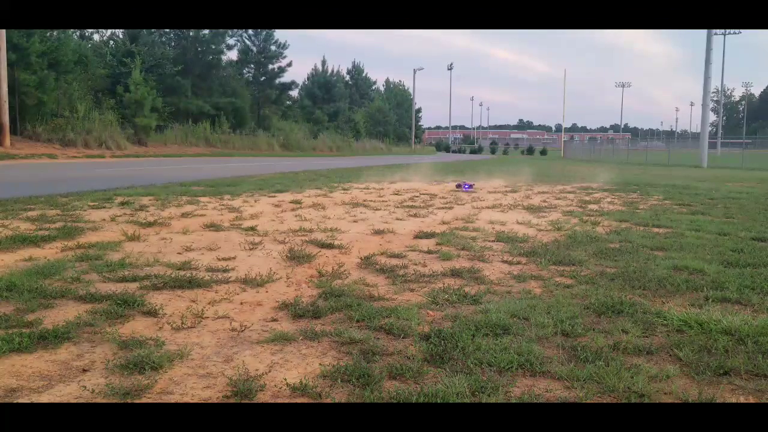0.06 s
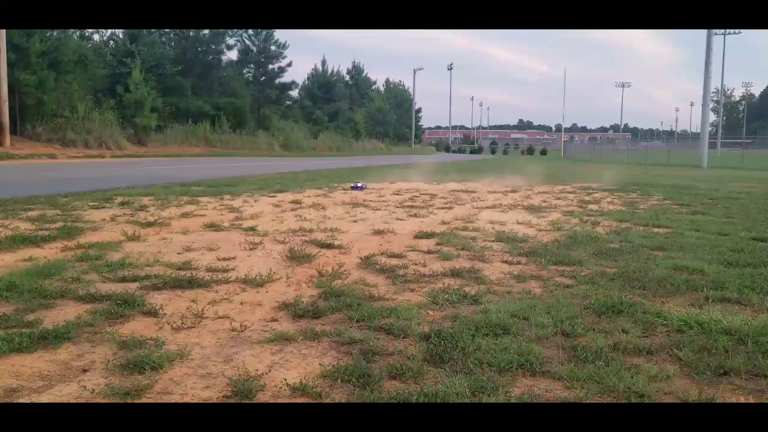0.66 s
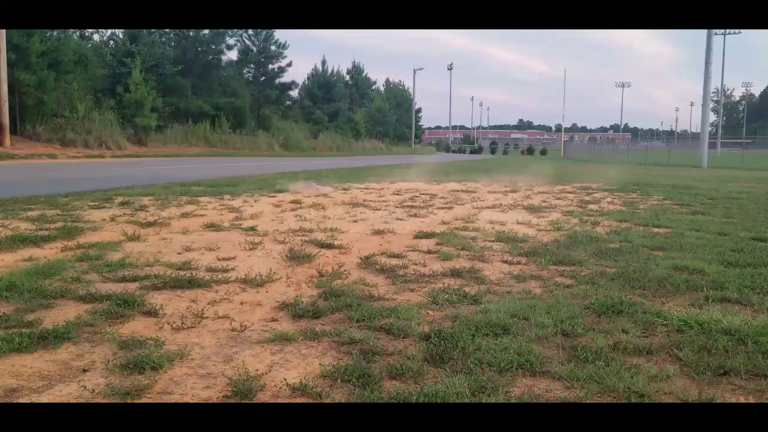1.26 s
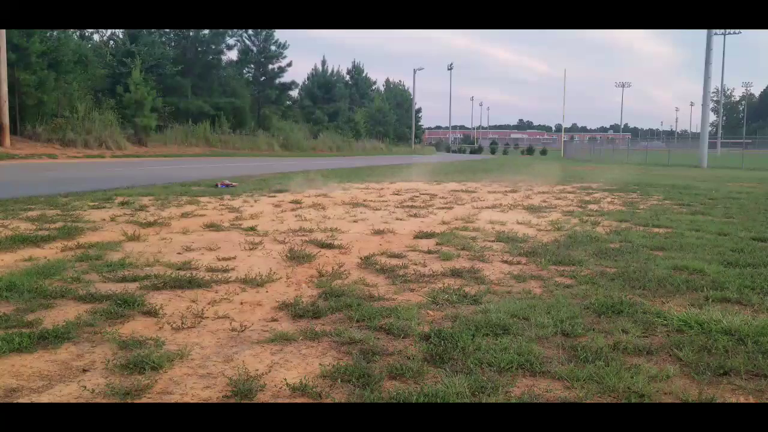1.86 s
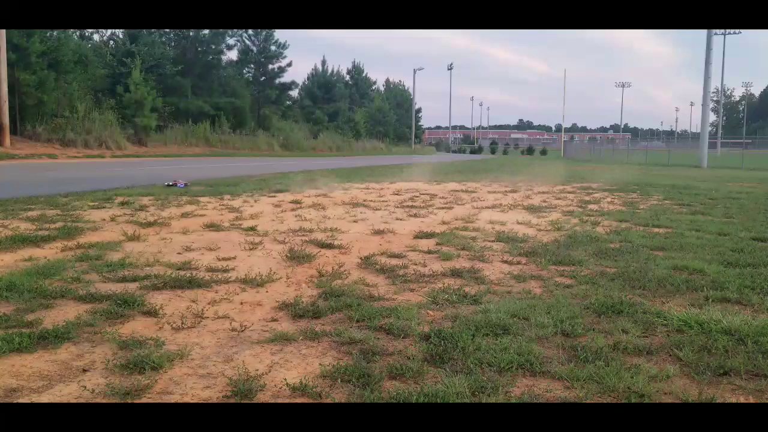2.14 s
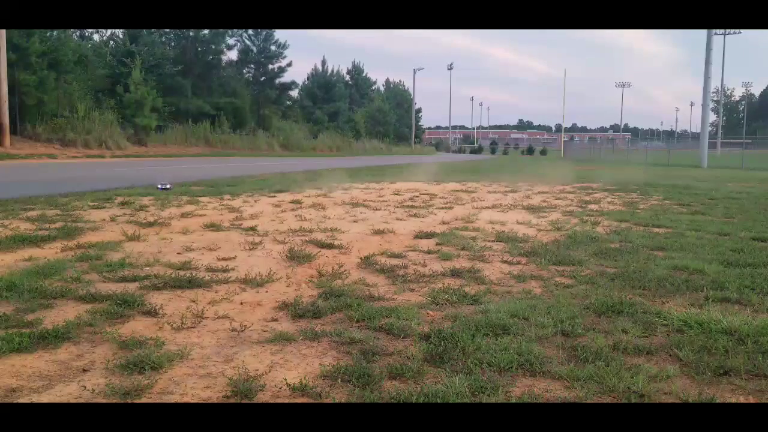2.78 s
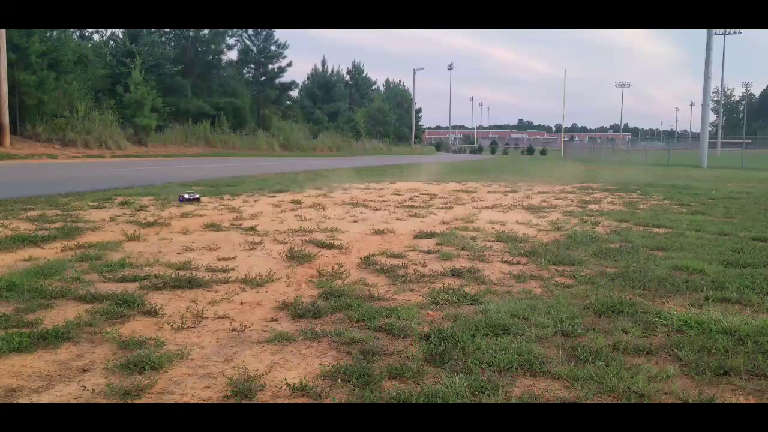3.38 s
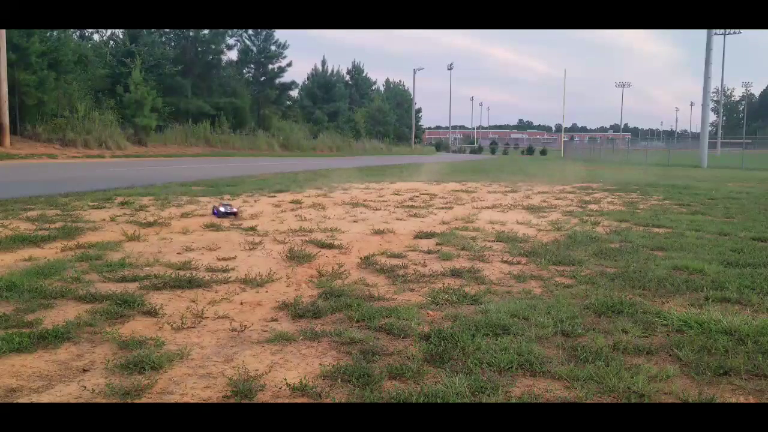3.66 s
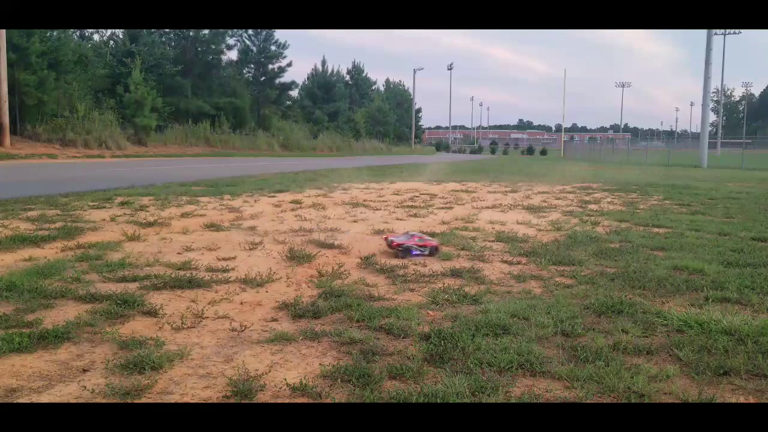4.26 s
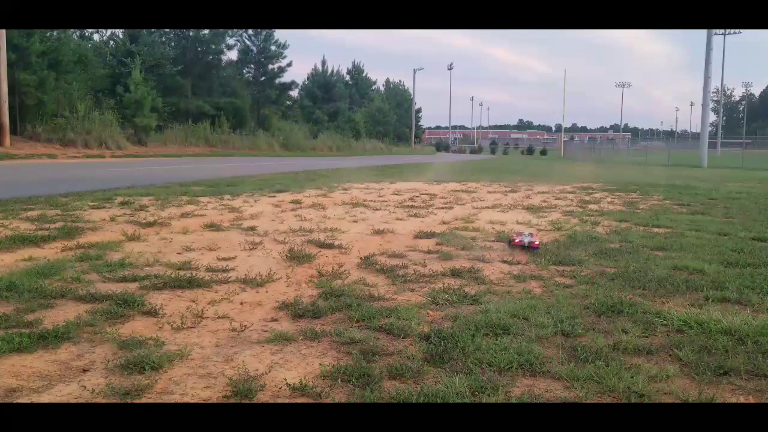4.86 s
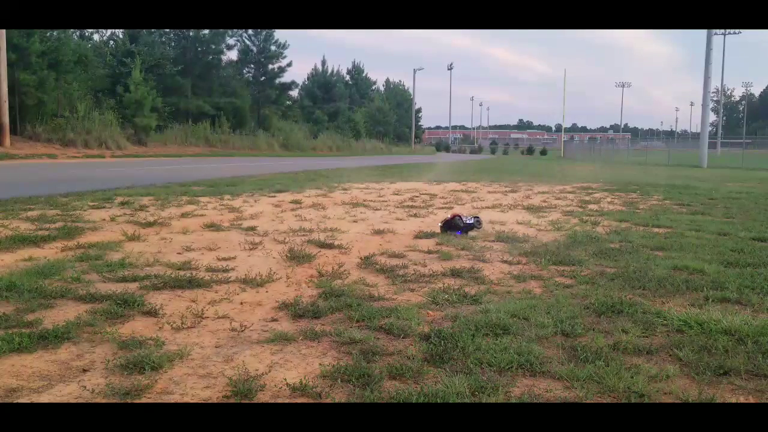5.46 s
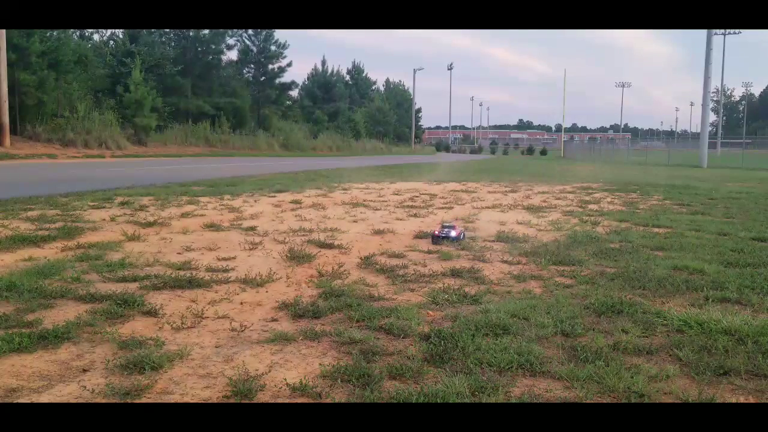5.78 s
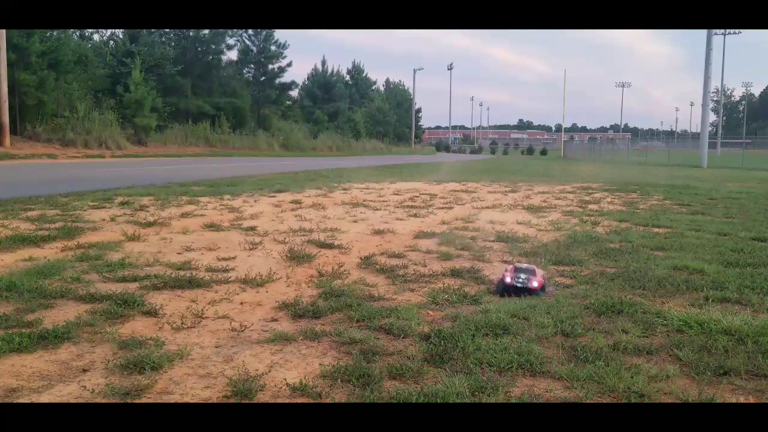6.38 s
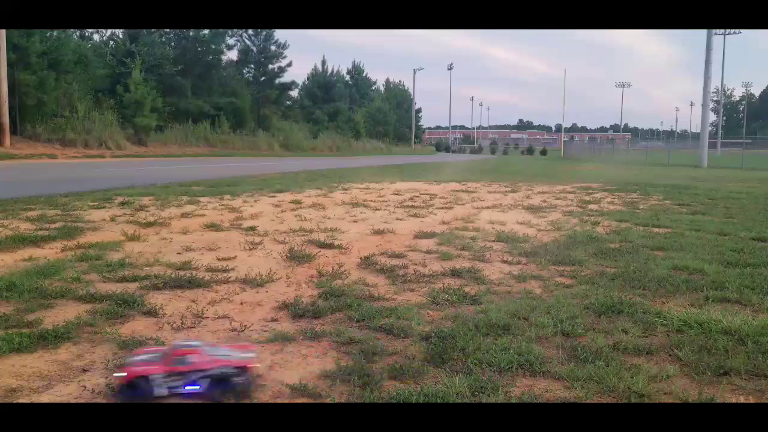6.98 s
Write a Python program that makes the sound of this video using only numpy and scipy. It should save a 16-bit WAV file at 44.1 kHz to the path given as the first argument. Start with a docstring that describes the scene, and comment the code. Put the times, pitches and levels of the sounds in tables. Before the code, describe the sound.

Outdoors, over a constant hiss, rumbling air and a distant droning engine, a toy truck's electric motor whines some way off. The pitch drops, then revs back up in short, raspy surges. As the truck approaches, its tyres scuff through sand and thud over grass tufts, the plastic shell knocks and the gears briefly rattle. The whine and scrabbling grow louder as it passes close to the microphone.

```python
"""Toy truck in an open field

A small electric truck laps a patch of dirt and grass, then passes close by. Its motor hums and its
gears whine, revving up on each hop and biting on each landing; free-spinning wheels set them rattling.
The tyres scrabble, throw grit and thud over tufts, and hard landings clatter the plastic body.
Behind it a far engine drones and the air rumbles, under a steady high hiss."""
import sys
import numpy as np
from scipy import signal
from scipy.fft import rfft, irfft
from scipy.io import wavfile
from scipy.ndimage import uniform_filter1d, map_coordinates

SR = 44100
rng = np.random.default_rng(int(sys.argv[2]) if len(sys.argv) > 2 else 0)


def wav_out(sig):
    """Save sig, one row per channel (or a flat mono array), as 16-bit PCM at SR to the path in sys.argv[1]."""
    wavfile.write(sys.argv[1], SR, np.round(np.clip(np.atleast_2d(sig).T, -1, 1) * 32767).astype(np.int16))


N = 314433
T = np.arange(N) / SR

# Rumble of open air. Each row: frequency in Hz, relative level in dB.
AIR_SPECTRUM = [(25, -16), (50, -2), (85, 3), (150, 3), (300, -9), (800, -27.5), (1200, -30), (2000, -96)]
# Steady high hiss, brightest near 7 kHz; the top of the sound has a deep gap around 11 kHz. Each row: frequency
# in Hz, relative level in dB.
HISS_SPECTRUM = [(2600, -11.5), (3300, 13), (6300, 15.5), (7100, 22.5), (7700, 14.5), (8500, -11),
                 (11000, -71), (14000, 8.5), (16000, -19)]
# Fader ride of the far engine. Each row: time in seconds, level in dB.
ENGINE_LEVEL = [(0, -51), (.6, -46), (3.3, -45), (3.75, -42), (5, -48), (7.13, -56)]
# Its partials. Each row: multiple of the firing rate, level in dB.
ENGINE_PARTIALS = [(.625, -14.5), (.875, -10.5), (1, 0), (1.375, -15), (1.625, -16.5)]
# The truck's path. Each row: time in seconds, lag of the right microphone in ms, sand over soil in dB.
PATH = [(0, 0.029, -1), (2.2, 0.14, -6), (3.3, 0.19, 1), (4.8, -0.05, -1.5), (5.6, -0.021, 8.5),
        (6.7, -0.037, -2), (7.13, 0.22, -1)]
# Bumps over tufts. Each row: start in seconds, level in dB.
TUFTS = [(0.809, -48), (1.656, -42.5), (2.841, -45.5), (3.749, -47.5), (4.485, -43.5), (4.63, -43.5),
         (6.101, -37.5)]
# The chassis hits the ground. Each row: start in seconds, level in dB.
CHASSIS_HITS = [(4.037, -42.5), (4.087, -44), (4.198, -46.5), (4.242, -45.5), (5.019, -46.5),
                (5.684, -40.5), (6.833, -46), (6.902, -41)]
# Ring of the plastic body. Each row: frequency in Hz, width in Hz, relative level in dB.
BODY_MODES = [(448.6, 130, 6), (766, 54, 26), (1105, 112, 27), (2050, 2800, 11)]
# Tyres sliding through a turn. Each row: start and length in seconds, first and last pitch in Hz,
# level in dB, flutter rate in Hz.
SLIDES = [(1.123, 0.035, 1076, 1100, -44.5, 79), (1.128, 0.22, 2192, 1421, -53.5, 260.2)]
# Scrabble of the rolling tyres. Each row: time in seconds, level in dB.
SCRABBLE_LEVEL = [(0, -55), (1.2, -52.5), (1.8, -57.5), (2.1, -58.5), (2.45, -73), (2.85, -57.5),
                  (3.85, -51.5), (4.45, -55), (4.7, -48.5), (5.5, -51.5), (6.55, -46.5), (7.13, -42)]
# The tyres dig in. Each row: start and length in seconds, level in dB.
SCUFFS = [(3.928, 0.089, -47.5), (4.034, 0.14, -45), (4.205, 0.098, -45.5), (5.059, 0.075, -48.5),
          (6.35, 0.066, -45), (6.684, 0.053, -39.5), (6.85, 0.19, -37.5)]
# Dull slap of tread on soil. Each row: frequency in Hz, relative level in dB.
SOIL_SPECTRUM = [(150, -36), (330, 5.5), (480, 10), (620, 5), (1150, 7.5), (1600, -0.5), (2400, -1),
                 (8000, -20.5)]
# Bright edge of sand and scraping gears. Each row: frequency in Hz, relative level in dB.
GRIT_SPECTRUM = [(1000, -4.5), (4200, 8), (8500, -6.5), (13000, 0.5), (16000, -6.5)]
# Pace between hops. Each row: time in seconds, tooth rate in Hz.
ROLLING_SPEED = [(0, 4200), (1.082, 4350), (1.308, 3907), (2.6, 1473), (2.71, 2408), (2.799, 2890),
                 (2.97, 3250), (3.4, 4265), (3.62, 4393), (3.9, 5100), (4.55, 1583), (5.27, 4460),
                 (6.5, 2569), (6.6, 3150), (6.802, 2590), (7.089, 2028)]
# The wheels lift, rev up, land and bite. Each row: landing time and air time in seconds,
# top and gripping tooth rates in Hz, level of the bite in dB.
HOPS = [(0.086, 0.052, 4433, 4120, -64), (.185, 0.041, 4400, 4208, -61), (.37, 0.042, 4400, 4206, -64),
        (.505, 0.04, 4420, 4100, -57), (.58, 0.03, 4400, 4090, -55), (.655, 0.034, 4300, 3601, -51),
        (.755, 0.038, 4900, 4543, -55), (0.945, 0.054, 4583, 4143, -56), (1.23, .05, 4023, 3770, -49.5),
        (1.39, 0.084, 4000, 3680, -50.5), (1.478, 0.043, 4130, 3854, -50), (1.565, 0.032, 4120, 3740, -47),
        (1.646, 0.038, 4370, 3500, -49), (2.895, 0.063, 3397, 2916, -59), (3.106, 0.11, 4423, 3385, -51.5),
        (3.289, 0.056, 4700, 3965, -53.5), (3.77, 0.065, 4830, 4176, -39.5),
        (4.657, 0.077, 2010, 1627, -37), (4.744, 0.034, 2753, 2438, -42), (4.845, 0.054, 3473, 3134, -47),
        (4.923, 0.034, 3636, 3413, -46), (5.036, 0.049, 4310, 3682, -46), (5.185, 0.081, 4000, 3883, -48.5),
        (5.69, 0.42, 5386, 4096, -47), (5.88, 0.031, 4150, 2961, -45), (5.987, 0.059, 3530, 3046, -44.5),
        (6.09, 0.051, 4090, 3300, -47), (6.142, 0.007, 3182, 3132, -42), (6.3, 0.13, 4533, 3937, -45.5),
        (6.385, 0.022, 3574, 2764, -53.5), (6.68, 0.092, 3900, 2960, -60), (6.915, 0.1, 3400, 3036, -37),
        (6.996, 0.024, 3140, 2390, -46)]
# Motor hum under throttle. Each row: time in seconds, level in dB.
HUM_LEVEL = [(0, -60.5), (1.12, -64), (1.7, -63), (1.8, -95), (2.55, -92), (2.75, -73), (3.55, -58.5),
             (4.0, -64), (4.5, -89), (4.8, -65), (5.17, -55.5), (5.3, -50), (5.66, -53.5), (5.8, -64.5),
             (6.48, -53), (6.62, -61), (6.8, -70)]
# Rotor and shaft tones. Each row: multiple of motor speed, level in dB.
HUM_PARTIALS = [(1.35, -11), (2.7, -8.5), (4, 3.5), (10.8, 2.5), (13.2, -1.5), (14.7, -4.5), (16, 0)]
# How the gearbox radiates. Each row: frequency in Hz, gain in dB.
GEARBOX_EQ = [(1800, -28.5), (3100, 7.5), (4100, 3), (5300, 6.5), (6500, 9), (10000, -28)]
# Free-spinning wheels. Each row: start and length in seconds, level in dB, attack and release in seconds.
FREE_SPINS = [(1.103, 0.029, -46.5, 0.014, 0.41), (5.485, 0.25, -38, 0.12, 0.0066)]
# Tones of the rattle. Each row: multiple of motor speed, level in dB.
RATTLE_PARTIALS = [(2.75, 22.5), (6.05, 3.5), (15.1, -19.5)]
# Gear whine between bites. Each row: time in seconds, level in dB.
WHINE_LEVEL = [(0, -65), (1.0, -62.5), (1.33, -47), (1.8, -81), (2.5, -82), (2.65, -43), (2.82, -53),
               (2.97, -51), (3.05, -61), (3.7, -47), (4.3, -94), (4.61, -41.5), (4.82, -52.5), (5.17, -54),
               (5.4, -61), (5.78, -51.5), (6.42, -63), (6.57, -42.5), (6.76, -74), (6.89, -38), (7.09, -49)]
# Its partials. Each row: multiple of motor speed, level in dB under throttle, level in dB while braking.
WHINE_PARTIALS = [(10.8, -13, -14), (12, 0, 0), (16, -11, -19), (24, -24, -16)]
# Rasp of the gears. Each row: time in seconds, roughness from 0 to 1.
GEAR_RASP = [(.6, .65), (1.3, .3), (2.9, .5), (3.1, .85), (4.8, .45), (6.6, .6), (6.9, .25)]

TEETH, MOTOR_TURNS_PER_WHEEL = 12, 6.65
SCUFF_ATTACK_S, SCUFF_RELEASE_S = 0.034, 0.015


def from_db(db):
    """Decibels to gain."""
    return 10 ** (np.asarray(db) / 20)


def unit_rms(x):
    """Scale to rms 1."""
    return x / np.sqrt(np.mean(x ** 2) + 1e-20)


def curves(rows):
    """Each column of a timed table, drawn out to every sample."""
    s, *columns = np.transpose(rows)
    return [np.interp(T, s, c) for c in columns]


def eq_gain(points, hz):
    """Gain of an EQ curve at any frequency."""
    f, db = np.transpose(points)
    return from_db(np.interp(np.log(np.maximum(hz, 1)), np.log(f), db))


def coloured(x, spectrum):
    """EQ a steady signal and cut the sub-bass; rms 1."""
    hz = np.arange(N // 2 + 1) * SR / N
    return unit_rms(irfft(rfft(x) * eq_gain(spectrum, hz) * (hz > 20), N))


def drift(rate_hz):
    """A smooth random wobble of rms about 1."""
    r = np.exp(-40 * np.pi * rate_hz / SR)
    slow = signal.lfilter([1], [1, -2 * r, r * r], rng.standard_normal(N // 20 + 4002))[4000:]
    return np.interp(np.arange(N) / 20, np.arange(len(slow)), unit_rms(slow))


def resonance(x, hz, width_hz):
    """Two-pole band-pass with a peak gain of 1."""
    r = np.exp(-np.pi * width_hz / SR)
    feedback = [1, -2 * r * np.cos(2 * np.pi * hz / SR), r * r]
    return signal.lfilter(np.array([1, 0, -1]) * (1 - r * r) / 2, feedback, x)


def tone(hz, rough, flutter_hz):
    """A gliding sine of rms 1, a share of which flutters at random."""
    phase = 2 * np.pi * np.cumsum(hz) / SR + rng.uniform(0, 2 * np.pi)
    rough = np.clip(rough, 0, 1)
    flutter = drift(flutter_hz) * np.sin(phase) + drift(flutter_hz) * np.cos(phase)
    return np.sqrt(2 * (1 - rough ** 2)) * np.sin(phase) + rough * flutter


def grains(per_s, spread_db):
    """Random clicks of uneven size."""
    sizes = from_db(spread_db * np.minimum(rng.exponential(1, N), 5))
    return (rng.random(N) < per_s / SR) * sizes * rng.choice([-1, 1], N)


def swell(start, length, attack=SCUFF_ATTACK_S, release=SCUFF_RELEASE_S):
    """An envelope that rises to 1 by the start, holds and dies away."""
    return np.exp(-np.clip(np.maximum((start - T) / attack, (T - start - length) / release), 0, 20))


def decays(hits, t60):
    """An envelope that jumps at each hit and falls 60 dB in t60 seconds."""
    return sum(from_db(db - 60 * np.maximum(T - s, 0) / t60) * (T >= s) for s, db in hits)


def open_air(level_db=-48.5, side_db=-12.0):
    """A low, narrow stereo bed of rumbling air."""
    mid, side = (coloured(white, AIR_SPECTRUM) for white in rng.standard_normal((2, N)))
    return from_db(level_db) * (mid + from_db(side_db) * side * [[1], [-1]])


def far_engine(centre_hz=135.4):
    """A far engine with uneven cylinders drones, slowly gaining speed."""
    firing_hz = np.linspace(centre_hz - 2, centre_hz + 2, N)
    drone = sum(from_db(db) * tone(k * firing_hz, rough=0.14, flutter_hz=6.2)
                for k, db in ENGINE_PARTIALS)
    return from_db(curves(ENGINE_LEVEL)[0]) * drone


def field_reverb(x, t60=0.35, wet_db=-18):
    """A faint, smooth tail scatters back from the ground and the trees."""
    t = T[:SR // 2]
    tails = rng.standard_normal((2, len(t))) * from_db(-60 * t / t60)
    tails *= from_db(wet_db) / np.linalg.norm(tails, axis=1, keepdims=True)
    return signal.fftconvolve(x[None], tails)[:, :N]


def tuft_thuds(t60=0.14, hz=500, width_hz=520):
    """Each tuft knocks a short, dull thud out of the hollow tyres."""
    noise = rng.standard_normal(N)
    hollow = lambda x: resonance(resonance(x, hz, width_hz), hz, width_hz)
    return hollow(decays(TUFTS, t60) * noise + 1e-18) / np.std(hollow(noise))


def chassis_clatter(t60=0.13, knock_db=9.0):
    """Each hard landing shakes a short clatter out of the plastic body."""
    clatter = decays(CHASSIS_HITS, t60) * unit_rms(grains(per_s=2000, spread_db=2.5)) + 1e-18
    ring = sum((-1) ** k * from_db(db) * resonance(clatter, hz, width)
               for k, (hz, width, db) in enumerate(BODY_MODES))
    return from_db(knock_db) * ring * np.std(clatter) / np.std(ring)


def tyre_slide():
    """The sliding tyres squeal briefly and scrape downward in pitch."""
    return sum(from_db(db) * swell(s, length)
               * tone(np.interp(T, [s, s + length], [from_hz, to_hz]), rough=0.89, flutter_hz=flutter)
               for s, length, from_hz, to_hz, db, flutter in SLIDES)


def tyre_scrabble(sand_db, stones_db=-32.0, soil_lump_db=2, sand_lump_db=1.4):
    """Tread slaps the soil in lumps and flings sand and crackling stones, most where the tyres dig in."""
    scuffs = sum(from_db(db) * swell(s, length) for s, length, db in SCUFFS)
    level = np.hypot(from_db(curves(SCRABBLE_LEVEL)[0]), scuffs)
    lumps = drift(rate_hz=13.6)
    slaps, patter = grains(per_s=2500, spread_db=2.2), grains(per_s=6000, spread_db=1.5)
    soil = from_db(soil_lump_db * lumps) * coloured(slaps, SOIL_SPECTRUM)
    sand = from_db(sand_db + sand_lump_db * lumps) * coloured(patter, GRIT_SPECTRUM)
    stones = unit_rms(resonance(grains(per_s=110, spread_db=3.5), hz=2200, width_hz=4500))
    return level * (soil + sand + from_db(stones_db) * stones)


def drive(min_grip_s=.033, grip_hz_per_s=70000, attack_s=0.0029, release_s=0.0058, air_lift_db=0.5):
    """Motor speed in Hz and whine in dB: the wheels race in each hop and bite as they land."""
    # The tyres take longer to pull down a higher rev.
    grips_s = [min_grip_s + abs(top_hz - low_hz) / grip_hz_per_s for _, _, top_hz, low_hz, _ in HOPS]
    gripping = [(s + grip_s, low_hz) for (s, _, _, low_hz, _), grip_s in zip(HOPS, grips_s)]
    tooth_hz = curves(sorted(gripping + [tuple(row) for row in ROLLING_SPEED]))[0]
    airborne = bites = 0
    for (s, air_s, top_hz, _, db), grip_s in zip(HOPS, grips_s):
        rev_up = 1 - np.clip((s - T) / air_s, 0, 1) ** 2
        hop = rev_up * np.clip(1 - (T - s) / grip_s, 0, 1)
        tooth_hz = tooth_hz + (top_hz - tooth_hz) * hop
        airborne = np.maximum(airborne, hop)
        bite = from_db(db) * swell(s + attack_s, grip_s - attack_s, attack_s, release_s)
        bites = np.maximum(bites, bite)
    whine = np.maximum(from_db(curves(WHINE_LEVEL)[0] + air_lift_db * airborne), bites)
    motor_hz = uniform_filter1d(tooth_hz, size=500) / TEETH   # inertia rounds every change of speed
    return motor_hz, 20 * np.log10(whine)


def wheel_turns(motor_hz):
    """A cosine with one cycle per turn of the wheels."""
    return np.cos(2 * np.pi * np.cumsum(motor_hz / MOTOR_TURNS_PER_WHEEL) / SR)


def body_ring(x, boost_db=15.0):
    """Tones bloom as they sweep through the main resonance of the plastic body."""
    hz, width, _ = BODY_MODES[2]
    return x + from_db(boost_db) * resonance(resonance(x, hz, width), hz, width)


def motor_hum(motor_hz, brighten_db=3.7, cruise_hz=370):
    """Rotor and shaft tones, clean below and raspy above, brighten as the revs climb to cruising speed."""
    octaves = np.minimum(np.log2(motor_hz / cruise_hz), 0)
    hum = sum(from_db(db + brighten_db * k * octaves)
              * tone(k * motor_hz, rough=.095 * k, flutter_hz=10 * k) for k, db in HUM_PARTIALS)
    return hum * from_db(curves(HUM_LEVEL)[0])


def gear_rattle(motor_hz, scrape_db=-5.5):
    """With the wheels off the ground the slack gears clash, one burst per wheel turn."""
    bursts = unit_rms(np.exp(wheel_turns(motor_hz)))
    clash = sum(from_db(db) * eq_gain(GEARBOX_EQ, k * motor_hz)
                * tone(k * motor_hz, rough=.16 * k, flutter_hz=100) for k, db in RATTLE_PARTIALS)
    scrape = from_db(scrape_db) * coloured(rng.standard_normal(N), GRIT_SPECTRUM)
    level = sum(from_db(db) * swell(s, length, attack, release)
                for s, length, db, attack, release in FREE_SPINS)
    return level * bursts * (clash + scrape)


def gear_whine(motor_hz, whine_db, bite_db=2.5, bite_per_s=0.46):
    """Meshing teeth sing harder while the ground drags the motor down; rough ground frays the note."""
    slowing = -np.gradient(np.log(motor_hz)) * SR
    slowing = uniform_filter1d(slowing, size=600, origin=150)   # slack delays the bite
    braking = np.tanh(slowing / bite_per_s)
    rasp = curves(GEAR_RASP)[0]
    wobble = .01 * drift(rate_hz=60) + .014 * wheel_turns(motor_hz)   # bumps and out-of-round wheels
    shaken_hz = motor_hz * (1 + rasp * wobble)
    teeth = sum(from_db(np.interp(braking, [0, 1], dbs)) * eq_gain(GEARBOX_EQ, k * motor_hz)
                * tone(k * shaken_hz, rasp, flutter_hz=90) for k, *dbs in WHINE_PARTIALS)
    return from_db(whine_db + bite_db * braking) * teeth


def scene():
    """The truck reaches the two microphones slightly apart in time, over the ambience of the field."""
    lag_ms, sand_db = curves(PATH)
    motor_hz, whine_db = drive()
    drivetrain = gear_whine(motor_hz, whine_db) + body_ring(motor_hum(motor_hz)) + gear_rattle(motor_hz)
    truck = drivetrain + tyre_scrabble(sand_db) + tyre_slide() + chassis_clatter() + tuft_thuds()
    right = map_coordinates(truck, [np.arange(N) - lag_ms * SR / 1000], mode="nearest")
    return np.array([truck, right]) + field_reverb(truck) + far_engine() + open_air()


def record(dry, hiss_db=-49.5, right_top_db=-12.5, lean_left_db=2.2, cutoff_hz=15800):
    """Hiss joins each channel; the right one is weaker and duller, and a steep low-pass trims both."""
    hiss = np.array([coloured(white, HISS_SPECTRUM) for white in rng.standard_normal((2, N))])
    left, right = dry + from_db(hiss_db) * hiss
    shelf = eq_gain([(9300, 0), (12000, right_top_db)], np.arange(N // 2 + 1) * SR / N)
    right = irfft(rfft(right) * shelf, N)
    pair = np.array([left, right]) * from_db([[lean_left_db], [-lean_left_db]])
    return signal.sosfilt(signal.ellip(10, .1, 80, cutoff_hz, fs=SR, output="sos"), pair)


dry = scene()
out = record(dry)
wav_out(out)
```